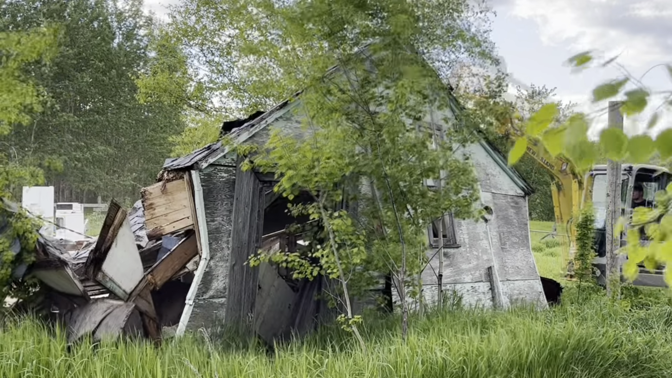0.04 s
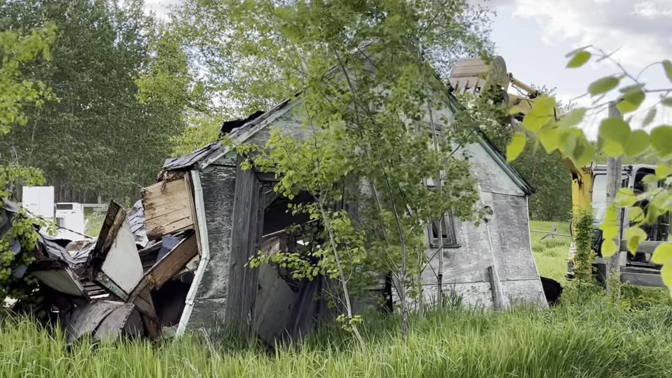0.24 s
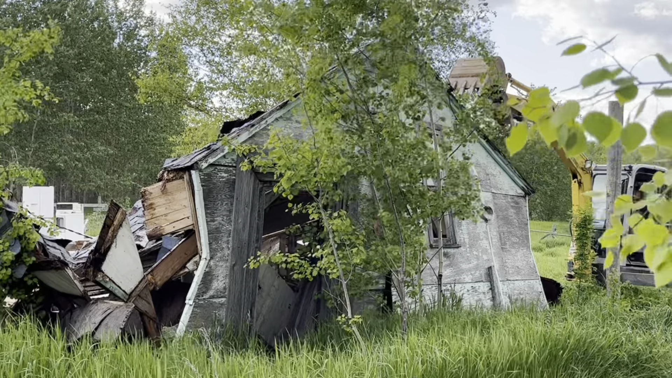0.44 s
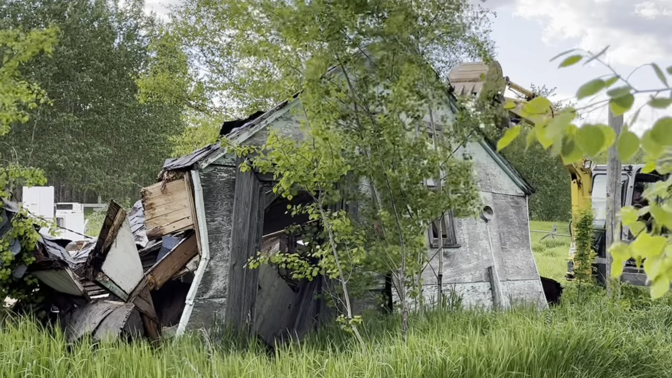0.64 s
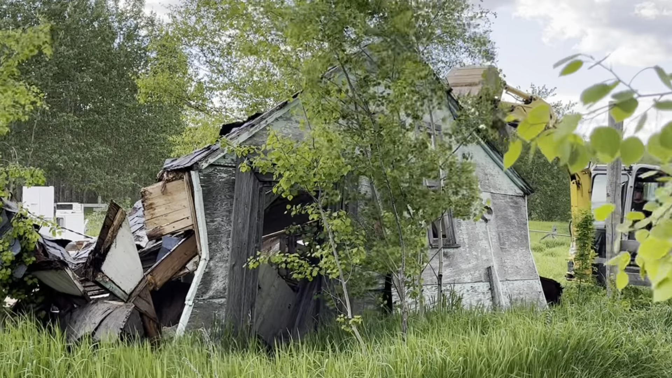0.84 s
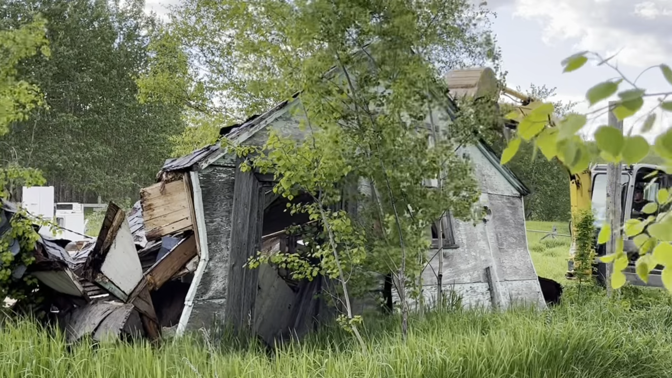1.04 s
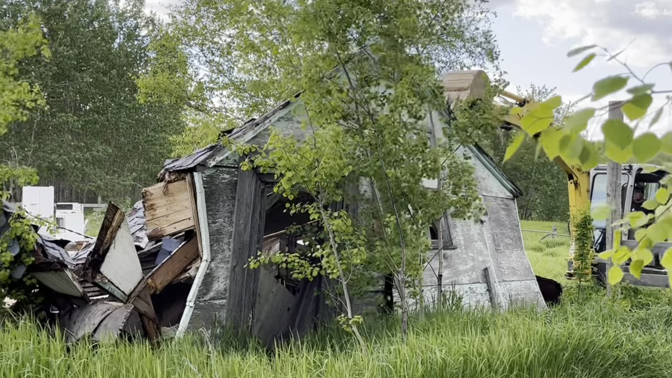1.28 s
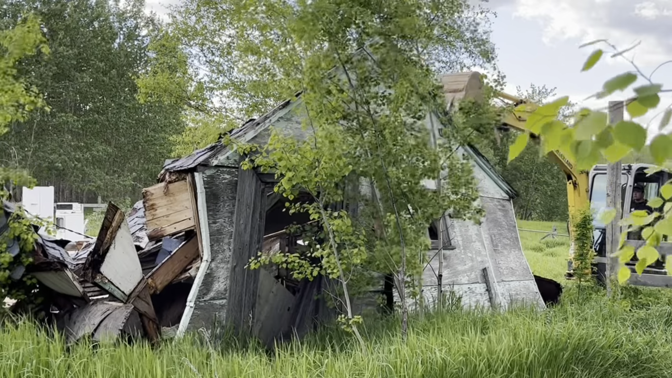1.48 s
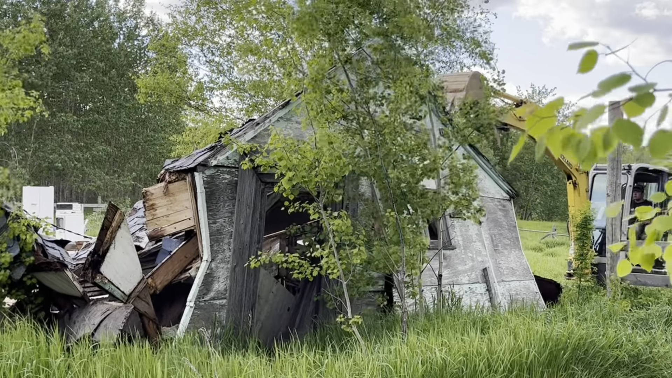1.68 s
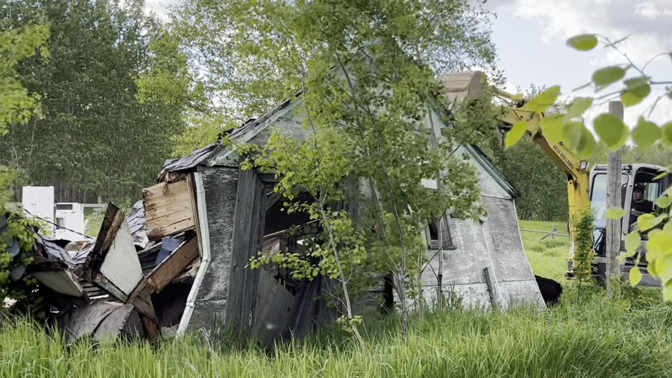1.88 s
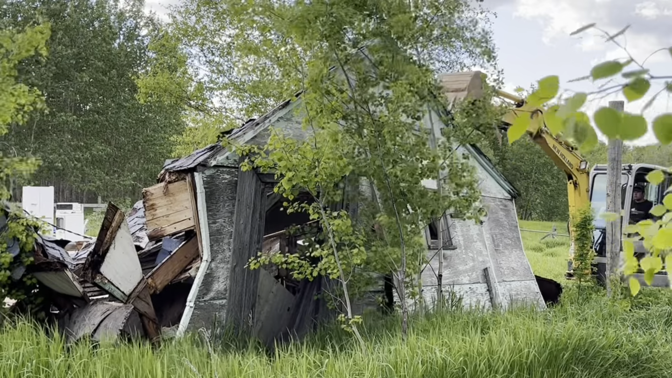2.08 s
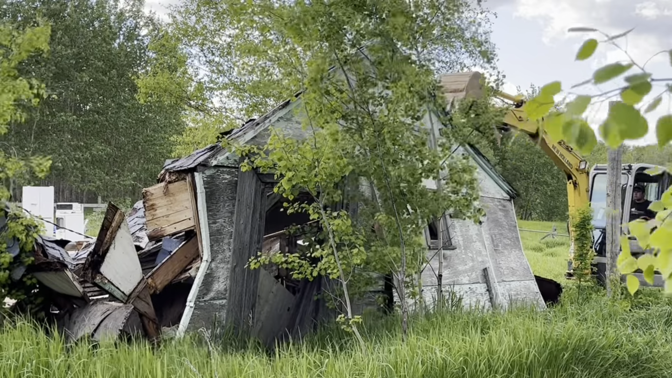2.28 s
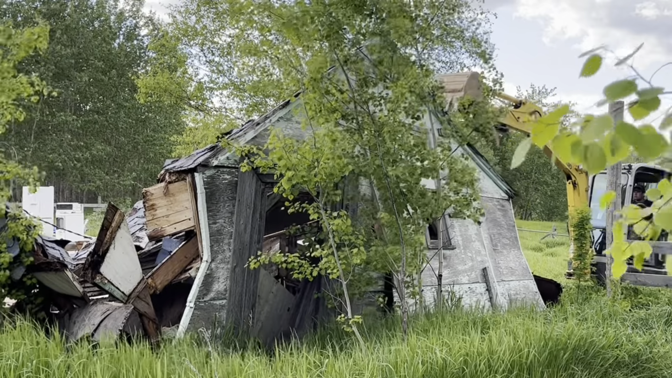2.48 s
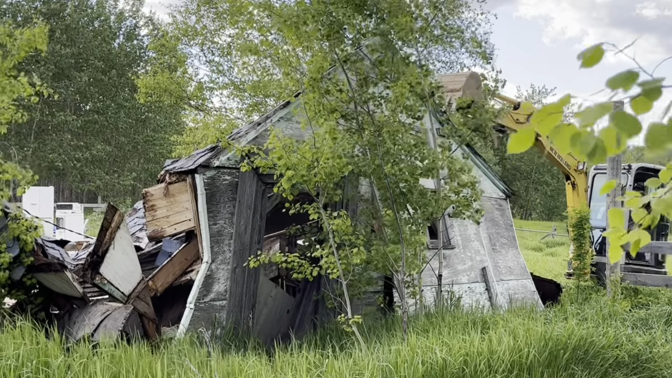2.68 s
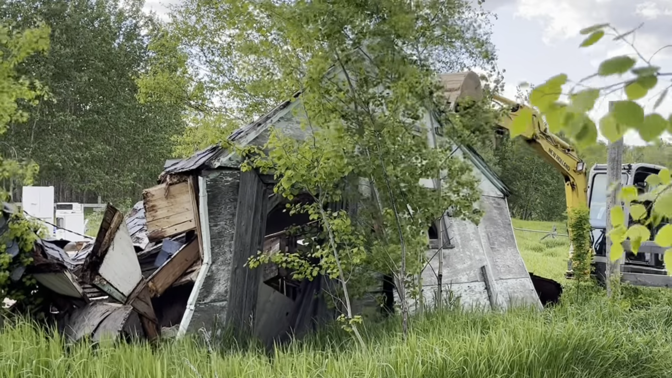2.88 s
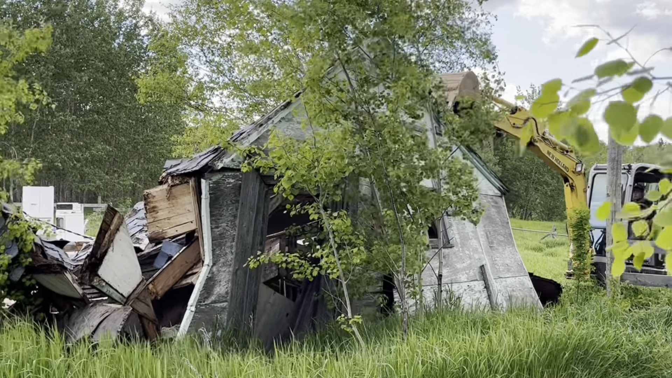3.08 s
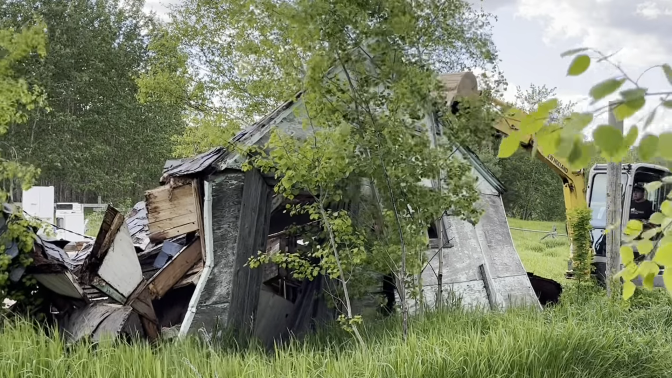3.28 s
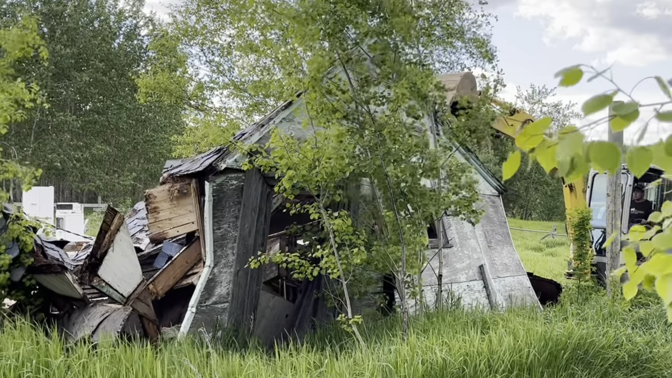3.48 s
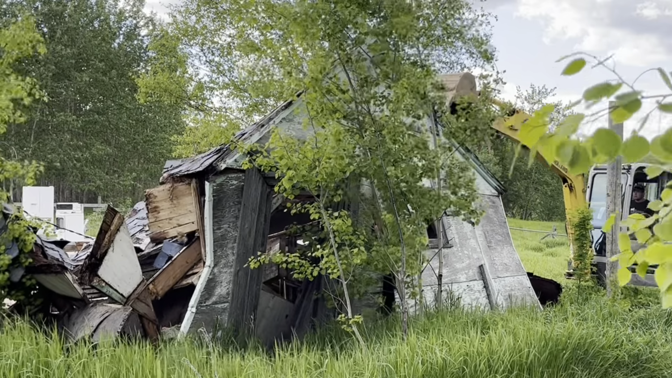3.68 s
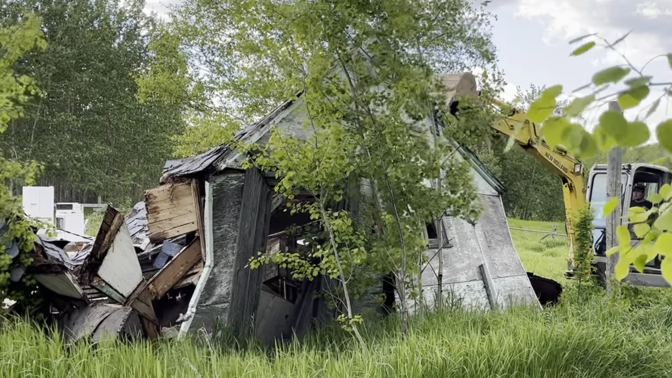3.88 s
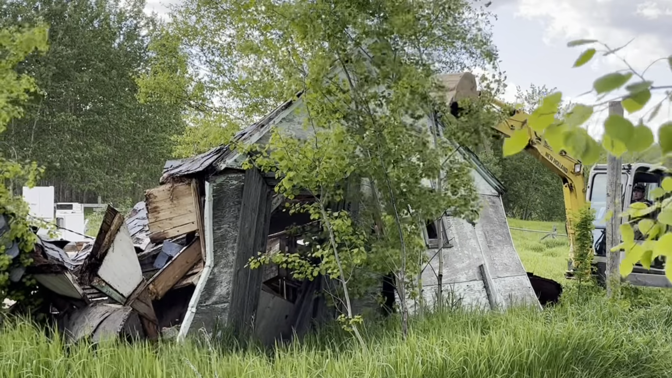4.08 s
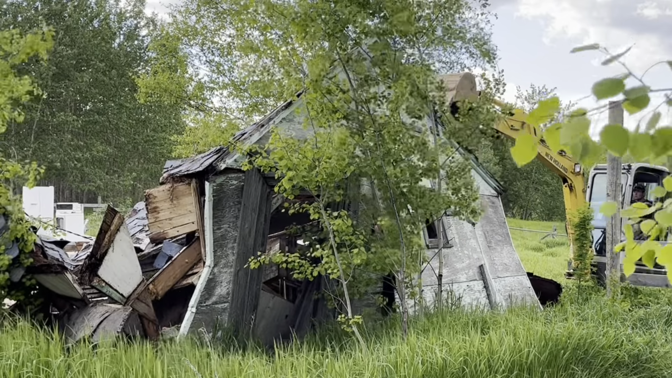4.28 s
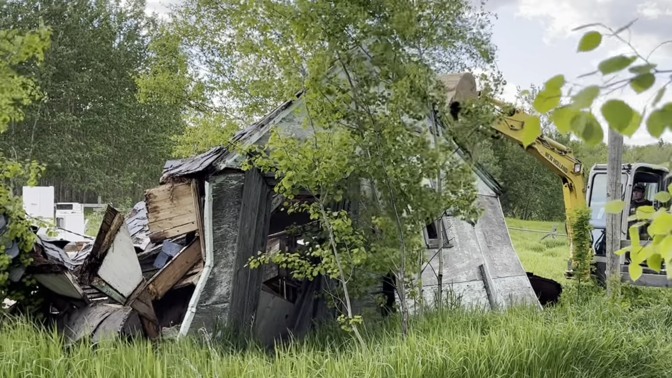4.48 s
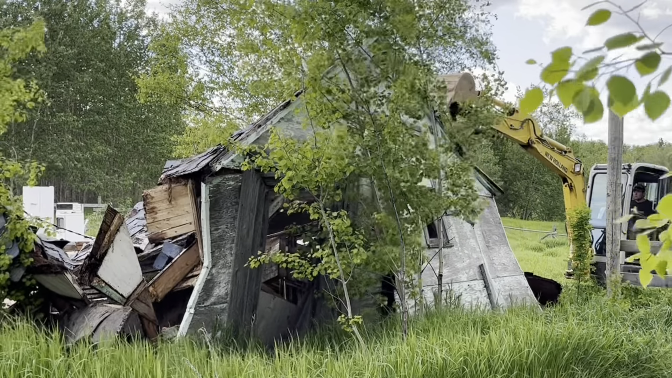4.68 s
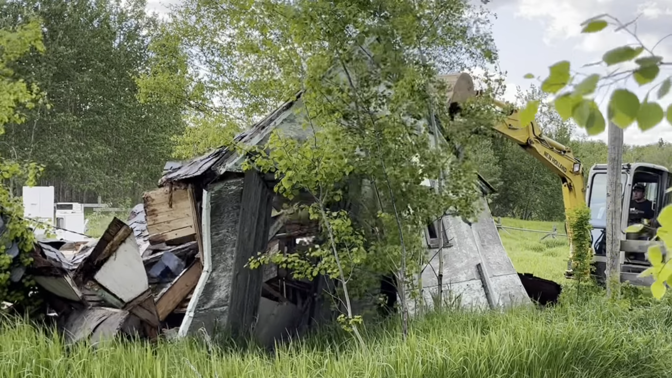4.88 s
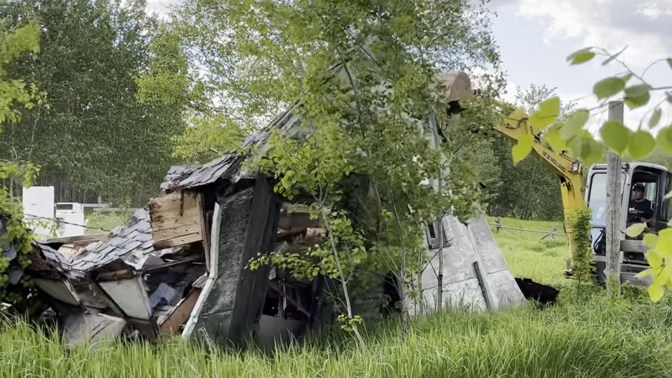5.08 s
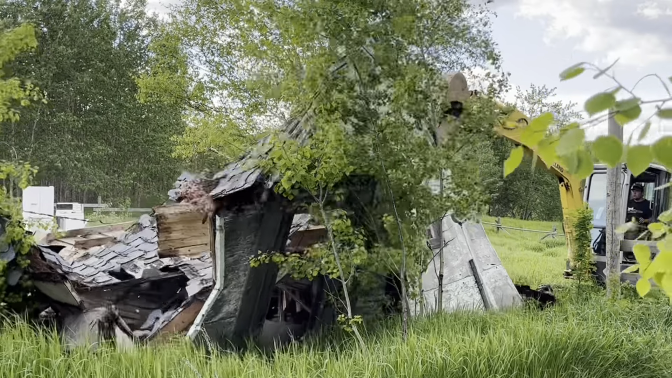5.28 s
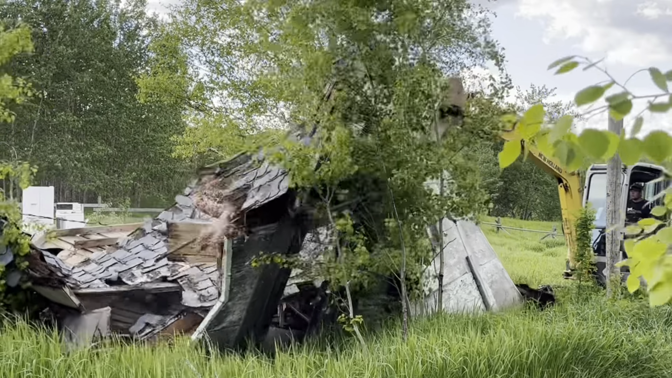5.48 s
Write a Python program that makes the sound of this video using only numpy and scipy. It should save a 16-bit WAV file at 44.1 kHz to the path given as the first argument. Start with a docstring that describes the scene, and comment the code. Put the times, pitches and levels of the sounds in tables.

```python
"""A grassy yard, where a small three-cylinder excavator drones while its bucket pushes an old wooden barn over.
The engine is a sum of firing harmonics with filtered knocks and a pump tone; low noise rumbles in gusts.
Boards crack and splinter as fibre noise through resonances, and debris rattles down as clumped noise and chips.
Single pieces ring or click, the roof collapses at the end, and sparse echoes return from trees and walls.
A pair of close microphone ports hears it all."""
import sys
import numpy as np
from scipy import signal
from scipy.fft import rfft, irfft, next_fast_len
from scipy.io import wavfile
from scipy.ndimage import uniform_filter1d

SR = 44100
rng = np.random.default_rng(int(sys.argv[2]) if len(sys.argv) > 2 else 0)


def to_wav(sig):
    """Store sig (one row per channel, or 1-D mono) as 16-bit WAV at the path in sys.argv[1].

    Samples outside -1..1 are clipped; the rate is SR.
    """
    pcm = np.clip(np.atleast_2d(sig), -1, 1) * 32767
    pcm = np.round(pcm).astype(np.int16)
    wavfile.write(sys.argv[1], SR, pcm.T)  # frames by channels


N = 244314


def amp(db):
    """Decibel law: 20 dB is a tenfold gain in amplitude."""
    return 10 ** (np.asarray(db) / 20)


def evened(x):
    """Normalisation: scales a signal to rms 1."""
    return x / np.sqrt(np.mean(x ** 2) + 1e-20)


def read(points, hz):
    """Logarithmic frequency scale: interpolates a spectrum table along it."""
    table_hz, value = np.transpose(points)
    return np.interp(np.log(hz + 1), np.log(table_hz + 1), value)


def curves(rows):
    """Linear interpolation: each column of a time table at every sample."""
    s, *columns = np.transpose(rows)
    return [np.interp(np.arange(N) / SR, s, column) for column in columns]


def drift(hz):
    """Low-passed noise: slow chance of rms 1 that changes about hz times a second."""
    b, a = signal.butter(2, hz, fs=SR)
    settled = signal.lfilter(b, a, rng.standard_normal(N + SR))[SR:]
    return evened(settled)


def coloured(x, points):
    """Minimum-phase filtering: a causal filter of energy 1 with the given spectrum."""
    hz = abs(np.fft.fftfreq(8192, 1 / SR))
    log_gain = np.log(amp(np.maximum(read(points, hz), -100)))
    # the Hilbert transform of the log gain gives the minimum phase
    spectrum = np.exp(np.conj(signal.hilbert(log_gain)))
    taps = np.fft.ifft(spectrum).real[:4096]
    return signal.oaconvolve(x, taps / np.linalg.norm(taps))[:N]


def snaps(shape, spread_db):
    """Impulsive noise: breaking fibres, a few samples far larger than the rest."""
    excess = np.minimum(rng.exponential(1, shape), 7)
    return evened(rng.standard_normal(shape) * amp(spread_db * excess))


def swell(s, db, rise_db, fall_db):
    """Exponential growth and decay: gain peaks at db at time s, with steady dB per second on both sides."""
    t = np.arange(N) / SR - s
    return amp(db + np.minimum(rise_db * t, -fall_db * t))


# pushes of the arm: start_s, end_s, loaded_firing_hz, whine_db (rms at the start), fade_db_per_s
ARM_PUSHES = [(0.987, 1.3, 59.1, -47, 13), (2.208, 3.67, 58.89, -39.5, 4), (4.141, 6, 57.96, -31, 6.5)]
FREE_HZ, DROOP_HZ_PER_S = 61.6, 1.3  # target firing rate when let go, and its droop from there
GOVERNOR_S = 0.11  # span of the first smoothing; the second is half as long
PUMP_REST_DB, PUMP_RISE_DB_PER_S, PUMP_FALL_DB_PER_S = -65, 358, 64


def governor():
    """Speed regulation under load: each push holds the firing rate down and makes the pump whine."""
    t = np.arange(N) / SR
    hz = FREE_HZ - DROOP_HZ_PER_S * t
    pump = amp(PUMP_REST_DB)
    for start, end, loaded_hz, db, fade_db in ARM_PUSHES:
        released = FREE_HZ - DROOP_HZ_PER_S * (t - end)
        hz = np.where(t < start, hz, np.where(t < end, loaded_hz, released))
        whine = swell(start, db, PUMP_RISE_DB_PER_S, fade_db)
        pump = pump + whine / amp(PUMP_FALL_DB_PER_S * np.maximum(t - end, 0))
    lag = round(GOVERNOR_S * SR)
    hz = uniform_filter1d(hz, lag, mode="nearest")
    return uniform_filter1d(hz, lag // 2, mode="nearest"), pump


# engine tones: multiple of the firing rate
TONE_MULTIPLES = 1, 2, 3, 4, 4.87, 10, 11.5
# level of each tone: unloaded_db (rms), full_load_change_db
TONE_LEVELS = [(-19.5, -0.5), (-30, 6.5), (-40, 3.5), (-47, -4), (-42.5, -18), (-51.5, -5.5), (-70, -14.5)]
# spectrum of the engine noise: frequency_hz, density_db (relative, per Hz)
CLATTER_SPECTRUM = [(200, -12), (420, -5), (620, -6.5), (800, -11), (1650, -25.5), (2050, -21.5),
                    (2900, -29.5), (4500, -40), (8000, -57), (15000, -54)]
CLATTER_DB = -45
UNLOADED_HZ, SAG_HZ = 61.4, 2.8  # firing rate that counts as unloaded, and its drop at full load
PUMP_ORDER = 20 / 3  # ten strokes a crank turn, three firings in two turns


def engine():
    """Harmonic synthesis: exhaust tones follow speed and load, the block clatters, the pump whines."""
    hz, whine = governor()
    load = np.clip((UNLOADED_HZ - hz) / SAG_HZ, 0, 1)
    firings = np.cumsum(hz * (1 + 0.00208 * drift(4.6))) / SR
    tones = 0
    for k, (db, load_db) in zip(TONE_MULTIPLES, TONE_LEVELS):
        level = amp(db + load_db * load + 0.73 * drift(65.0))
        # a suction pulse, its overtones slightly late
        tones = tones + level * np.cos(2 * np.pi * k * firings + np.pi + 0.83 * (1 - k))
    pump = whine * amp(1.1 * drift(4.2)) * np.cos(2 * np.pi * PUMP_ORDER * firings)
    # knocks that repeat each firing, and others that repeat each full cycle of three
    cycle = np.tile(rng.standard_normal(300), 3) + 0.7 * rng.standard_normal(900)
    knocks = np.interp(firings * 300 % 900, np.arange(900), cycle)
    clatter = evened(coloured(rng.standard_normal(N) + 0.8 * knocks, CLATTER_SPECTRUM))
    return np.sqrt(2) * (tones + pump), amp(CLATTER_DB) * clatter


# gusts of low rumble: peak_s, level_db (before the calm level and random swelling)
RUMBLE_GUSTS = [(0, -32), (0.701, -61.5), (1.968, -45.5), (3.26, -28.5), (4.55, -39), (4.79, -33),
                (4.98, -17), (5.29, -14), (5.45, -18.5)]
# spectrum of the rumble: frequency_hz, density_db (relative, per Hz)
RUMBLE_SPECTRUM = [(20, -26.5), (45, 5.5), (70, 12), (110, 3), (180, 2.5), (300, -38.5)]
GUST_RISE_DB_PER_S, GUST_FALL_DB_PER_S, CALM_DB = 111, 100, -43.5


def rumble():
    """Amplitude-modulated noise: lumpy low noise that comes in gusts."""
    gusts = amp(CALM_DB)
    for s, db in RUMBLE_GUSTS:
        gusts = gusts + swell(s, db, GUST_RISE_DB_PER_S, GUST_FALL_DB_PER_S)
    lumps = amp(2.15 * drift(9.2))
    return gusts * lumps * coloured(rng.standard_normal(N), RUMBLE_SPECTRUM)


# debris trickling down, then the roof collapsing: time_s, level_db, splinter_db (against level_db)
DEBRIS_TRICKLE = [(0, -65, -3), (.25, -74.5, -13), (1.65, -58.5, -11), (4.0, -55, -12), (4.4, -45.5, -13),
                  (4.75, -33, -10), (5.1, -29.5, -11), (5.54, -25, -11)]
# bouts of tearing: peak_s, level_db, build_up_db_per_s, splinter_db (against level_db)
TEARING_BOUTS = [(0.785, -41.5, 338, -30), (0.988, -35.5, 237.5, -25), (1.529, -48, 23, -9),
                 (2.799, -32, 290, -15.5), (3.272, -41, 36.5, -9.5)]
TEAR_FALL_DB_PER_S = 156.5


def debris():
    """Superposition of envelopes: debris level in dB, and that of its splinters against it."""
    db, splinter_db = curves(DEBRIS_TRICKLE)
    whole, fine = amp(db), amp(db + splinter_db)
    for s, peak_db, rise_db, relative_db in TEARING_BOUTS:
        tear = swell(s, peak_db, rise_db, TEAR_FALL_DB_PER_S)
        whole, fine = whole + tear, fine + tear * amp(relative_db)
    return 20 * np.log10(whole), 20 * np.log10(fine / whole)


def rattle(db, splinter_db):
    """Clustered random impacts: blows of debris on planks, frame, laths and splinters, and their bunching."""
    # lesser cracks come at random, 45 a second
    small = (rng.random(N) < 45.0 / SR) * np.minimum(rng.exponential(1.0, N), 0.9)
    trails = signal.lfilter([1], [1, -np.exp(-1 / (0.0084 * SR))], small)  # 8.4 ms decay constant
    bunches = amp(db + 1.68 * drift(43.0)) * evened(1 + trails)
    clumps = [amp(1.72 * drift(12.0)) for part in range(4)] * bunches
    levels = amp([[-6.0], [0.5], [-9.0], [0.4]] + np.outer([0, 0, 0, 1], splinter_db))
    blows = signal.lfilter([1, .4], [1], snaps(N, 3.26))  # a little duller than a fresh break
    return clumps * levels * blows, bunches


def struck(x, modes):
    """Modal synthesis: x rings a set of decaying modes, of energy 1 together."""
    t = np.arange(3000) / SR
    tone = 0
    for hz, width, db in modes:
        decay = np.exp(-np.pi * width * t)
        tone = tone + amp(db) * np.sqrt(width) * decay * np.sin(2 * np.pi * hz * t)
    return signal.oaconvolve(x, tone / np.linalg.norm(tone))[:N]


def pieces(x, modes, spread_octaves):
    """Scaling of modes with length: every 36 ms a piece drawn from five sizes takes the blows."""
    which = rng.integers(0, 5, N // 1600 + 1).repeat(1600)[:N]
    scales = 2 ** (spread_octaves * np.linspace(-1, 1, 5))  # shorter pieces ring higher
    return sum(struck(x * (which == k), np.array(modes) * [scale, scale, 1])
               for k, scale in enumerate(scales))


def chips(level):
    """Random impacts on small resonators: short pieces snap or land, each size with its own brief ring."""
    t, out = np.arange(600) / SR, np.zeros(N)
    for hz in np.geomspace(500, 4200, 24):
        hits = (rng.random(N) < 14.0 / SR) * amp(3.7 * np.minimum(rng.exponential(1, N), 4))
        envelope = (t * hz) * np.exp(-t * hz / 2.0)
        ring = np.sin(2 * np.pi * hz * t) * envelope * (hz / 1000) ** 0.39
        out += signal.oaconvolve(hits, ring)[:N]
    return level * evened(out)


# cracks: start_s, level_db (of the envelope, before the part gains), pitch_octaves (above the frame),
# t60_ms (of the break, before the share of each part; at least 5 ms is used)
BREAKS = [(0.747, -36.5, 3, 37), (0.777, -16.5, 1.53, 115), (0.967, -17.5, 1, 75), (1.018, -25.5, 1.5, 29),
          (1.096, -25.5, 0.95, 89), (1.201, -24, 1.7, 33), (1.288, -29.5, 4, 66), (1.299, -27, 5.5, 28),
          (1.346, -16, 2, 14), (1.396, -16, 1.27, 26), (1.428, -18, 1.36, 20), (1.472, -35, 3.5, 17),
          (1.5, -22.5, 1.9, 87), (1.538, -21.5, 2, 87), (2.215, -20.5, 2, 91), (2.373, -25.5, 2, 45),
          (2.613, -22.5, 2.02, 56), (2.635, -17, 1.5, 67), (2.754, -8, 0.7, 21), (2.775, -10, 0.5, 22),
          (2.787, -7, 0.92, 27), (2.801, -4.5, 0.5, 38), (2.848, -6.5, 0.5, 38), (2.874, -10, 2.5, 18),
          (2.907, -4.5, 0.5, 37), (2.935, -26, 2, 26), (2.989, -15, 1.37, 29), (3.034, -4.5, 0.93, 35),
          (3.064, -16.5, 2, 23), (3.098, -24, 4, 8.9), (3.12, -26, 3, 56), (3.181, -29.5, 4.5, 54),
          (3.19, -4.5, 0.97, 39), (3.242, -11.5, 2.5, 68), (3.347, -4, 1.08, 35), (3.351, -15, 5, 13),
          (3.367, -11, 1, 65), (3.399, -28, 4, 64), (3.677, -17, 1.96, 57), (3.768, -29.5, 2.5, 79),
          (4.117, -35.5, 2, 160), (4.145, -21, 0.83, 58), (4.244, -23.5, 0.5, 85), (4.313, -15.5, 1, 88),
          (4.36, -19.5, 1.5, 72), (4.528, -7, 0.4, 14), (4.541, -6, 1.96, 35), (4.572, -16, 1.5, 46),
          (4.628, -16, 3, 13), (4.668, -13, 1, 66), (4.704, -11.5, 1.5, 48), (4.748, -15.5, 2, 52),
          (4.769, -24, 2.5, 19), (4.788, -7, 0.4, 57), (4.854, -8.5, 2, 24), (4.874, -15, 2.5, 20),
          (4.92, -4.5, 2, 45), (5.004, -7, 2.5, 34), (5.024, -15.5, 2.5, 66), (5.054, -18, 2.5, 33),
          (5.109, -16.5, 2, 140), (5.173, -9, 1, 19), (5.198, -7.5, 1.5, 20), (5.24, -9, 2, 120),
          (5.293, -9, 1, 30), (5.357, -4.5, 2, 29), (5.38, -5.5, 2.5, 28), (5.485, -23, 7, 21)]
# planks, frame, laths, splinters: pitch_octaves (above the frame)
PART_PITCH = np.log2([2.5, 1, 7.5, 20])
# planks, frame, laths, splinters: response_db (how readily each part answers)
PART_RESPONSE = [-5, 3, -6, 1.5]
OFF_PITCH_DB = 3  # loss per squared octave away from the pitch of the piece


def cracks():
    """Fracture as burst excitation: each crack is a quick run of breaks with a trail of fibres."""
    drive, t = np.zeros((4, N + 5000)), np.arange(5000) / SR
    # as a share of the t60: long breaks build up, the heavy frame most slowly
    rise = np.array([[.03], [.06], [.035], [.04]])
    lasting = np.array([[1], [1.1], [.9], [.8]])  # thin parts stop sooner
    # fibres start to give just before the break, over 400 samples
    giving = np.tile(0.083 * np.linspace(0, 1, 400) ** 2, (4, 1))
    for s, level_db, octaves, t60_ms in BREAKS:
        t60 = lasting * max(t60_ms, 5) / 1000
        fall = amp(-60 * t / t60) + 0.025 * amp(-60 * t / 0.26)  # break, then fibre trail
        shape = (1 - np.exp(-t / (rise * t60))) * fall
        shape = np.hstack([giving, shape[:, :-400]])
        db = level_db + np.array(PART_RESPONSE) - OFF_PITCH_DB * (PART_PITCH - octaves) ** 2
        # parts break together but not alike
        burst = snaps(5000, 4.64) + 1.38 * rng.standard_normal((4, 5000))
        # the envelope sets the energy of each break
        size = np.linalg.norm(shape, axis=1) / np.linalg.norm(burst * shape, axis=1)
        at = round(s * SR) - 400
        drive[:, at:at + 5000] += burst * shape * (size * amp(db))[:, None]
    return drive[:, :N]


# beams and walls, for the middle size: pitch_hz, width_hz, level_db (relative)
FRAME_MODES = [(178, 64, -4.5), (321.3, 83, 8.5), (247, 110, -0.5), (457, 103, 6.5), (594, 29, -4.5)]
# planks, for the middle size: pitch_hz, width_hz, level_db (relative)
PLANK_MODES = [(535, 90, -6.5), (891, 70, -4), (922, 290, -4), (1377, 140, -3), (1784, 160, -10.5)]
# spectrum of laths and shingles: frequency_hz, density_db (relative, per Hz)
LATH_SPECTRUM = [(1300, -31), (2200, 7), (3200, 4.5), (4200, -0.5), (5500, -20)]
# spectrum of splinters: frequency_hz, density_db (relative, per Hz)
SPLINTER_SPECTRUM = [(3000, -28.5), (4800, 2), (7000, 4.5), (11000, 0), (14000, -5.5), (15600, -32.5)]


def timber():
    """Source and resonator: cracks and debris shake frame, planks, laths and splinters."""
    db, splinter_db = debris()
    blows, bunches = rattle(db, splinter_db)
    plank, frame, lath, splinter = cracks() + blows
    body = pieces(frame, FRAME_MODES, 0.073) + pieces(plank, PLANK_MODES, 0.39)
    body = body + coloured(lath, LATH_SPECTRUM) + coloured(splinter, SPLINTER_SPECTRUM)
    return body + chips(amp(0.33 * db + 7) * bunches)  # chips fly mostly when the debris is thick


# single pieces that ring out, low ones with a clear note, the briefest as broad dry clicks:
# start_s, centre_hz, level_db (rms at the start), t60_s
SINGLE_PIECES = [(0.782, 375, -21, 0.18), (0.963, 432, -26.5, 0.17), (0.97, 2265, -24, 0.044),
                 (1.11, 302, -21, 0.083), (1.349, 624, -37, 0.15), (2.846, 199, -15.5, 0.099),
                 (2.904, 836, -9, 0.03), (2.963, 4120, -9.5, 0.012), (3.245, 4040, -27, 0.2),
                 (4.541, 1455, -15.5, 0.056), (4.789, 1186, -7.5, 0.038), (5.199, 3820, -7, 0.015),
                 (5.337, 1780, -16, 0.048), (5.421, 3150, -14.5, 0.044)]


def rings():
    """Resonance bandwidth: dying fibre noise through one peak a piece, broader where the ring is shorter."""
    out, t = np.zeros(N + 9000), np.arange(9000) / SR
    for s, hz, db, t60 in SINGLE_PIECES:
        width_hz = 10.0 / t60 + 0.034 * hz
        b, a = signal.iirpeak(hz, hz / width_hz, SR)
        tone = evened(signal.lfilter(b, a, snaps(9000, 0.44)))
        # heavy pieces sound a clearer note
        tone = evened(tone + 2360.0 / hz * np.sin(2 * np.pi * hz * t))
        envelope = amp(db - 60 * t / t60) * (1 - np.exp(-t / 0.0013))
        out[round(s * SR):][:9000] += envelope * tone
    return out[:N]


# echoes off trees and walls: frequency_hz, t60_s
YARD_DECAY = [(200, 0.37), (2000, 0.23), (12000, 0.33)]


def yard(x):
    """Frequency-dependent reverberation: sparse echoes of random sign, each band dying at its own speed."""
    taps = np.zeros(SR // 2)
    at = np.arange(300, SR // 2 - 20, 20)
    taps[at + rng.integers(0, 20, len(at))] = rng.choice([-1., 1.], len(at))
    hz, t, z = signal.stft(taps, SR, nperseg=256)
    t60 = np.maximum(read(YARD_DECAY, hz), .03)[:, None]
    tail = signal.istft(z * amp(-60 * t / t60), SR, nperseg=256)[1]
    return signal.oaconvolve(x, tail / np.linalg.norm(tail))[:N]


def scene():
    """Phase randomisation: the sound at the microphone, and beside it a copy scattered along changing paths."""
    tones, clatter = engine()
    low = rumble()
    wood, notes = timber(), rings()
    echoes = amp(-11.0) * yard(wood + 0.33 * notes)
    loose = clatter + wood + notes + echoes + low
    z = signal.stft(loose, nperseg=256, noverlap=192)[2]
    random_phase = np.exp(2j * np.pi * rng.random(z.shape))
    scattered = signal.istft(z * random_phase, nperseg=256, noverlap=192)[1][:N]
    return np.array([tones + loose, scattered * np.std(loose) / np.std(scattered)])


# likeness of the two ports: frequency_hz, likeness (0-1)
PORT_LIKENESS = [(100, 1), (600, .93), (1500, .8), (2100, .94), (5200, .82), (8300, .95), (13500, .86)]
# phase by which the left port leads the right: frequency_hz, lead_rad
PORT_LEAD = [(0, 0), (430, 0.28), (1100, 0.2), (3360, 0.69), (4740, 0.87), (5900, 0.4), (8010, -3.5),
             (11100, -5), (15200, -9.5)]
EDGE_HZ = 15700  # upper band limit


def record(dry):
    """Spatial coherence: two ports share most of the sound, with a phase lead; bass cut, band limit."""
    size = next_fast_len(N + 4096)
    hz = np.fft.rfftfreq(size, 1 / SR)
    direct, scattered = rfft(dry, size)
    apart = np.arccos(np.clip(read(PORT_LIKENESS, hz), 0, 1)) / 2
    turn = np.exp(.5j * np.interp(hz, *np.transpose(PORT_LEAD)))  # half the lead for each port
    shared, differing = np.cos(apart) * direct, np.sin(apart) * scattered
    left = (shared + differing) * turn * amp(0.35)
    right = (shared - differing) / turn
    bass_cut = 1 / np.sqrt(1 + (44.0 / (hz + 1)) ** 8)
    ports = irfft(np.array([left, right]) * bass_cut, size)[:, :N]
    ports = 1.1 * np.tanh(ports / 1.1)  # the loudest cracks are gently squeezed
    band_limit = signal.firwin(511, EDGE_HZ, window=("kaiser", 9), fs=SR)
    return signal.oaconvolve(ports, band_limit[None], "same")


dry = scene()
out = record(dry)
to_wav(out)
```